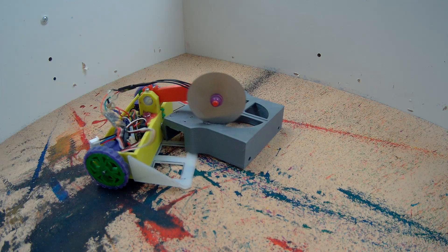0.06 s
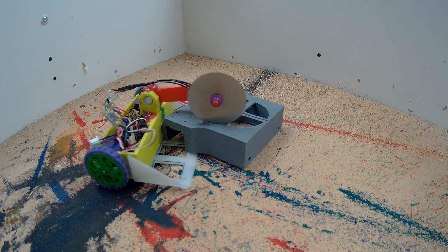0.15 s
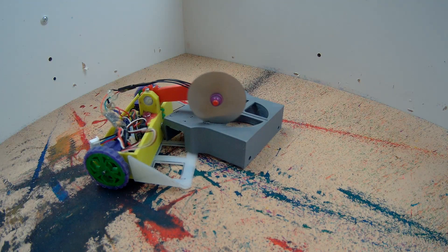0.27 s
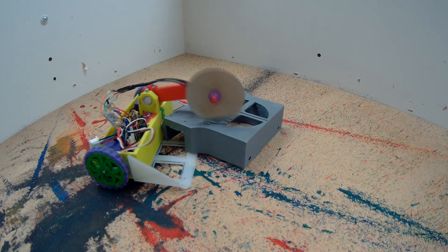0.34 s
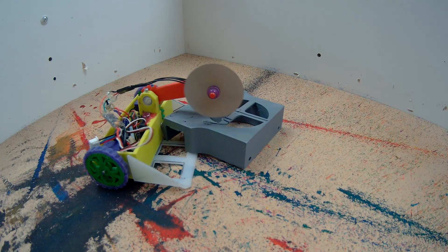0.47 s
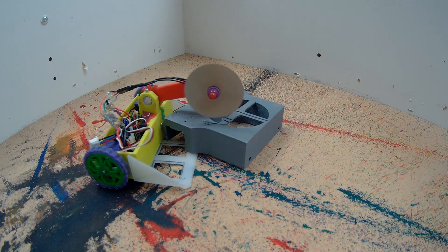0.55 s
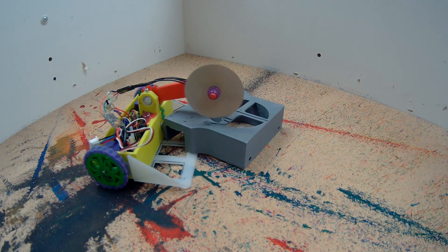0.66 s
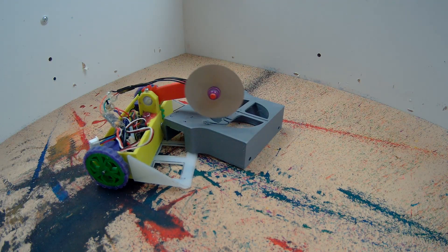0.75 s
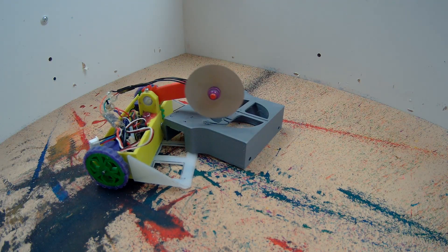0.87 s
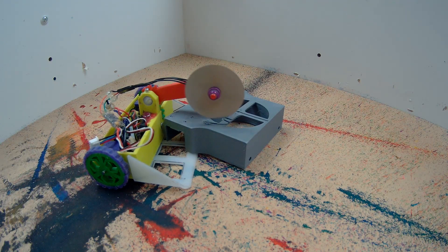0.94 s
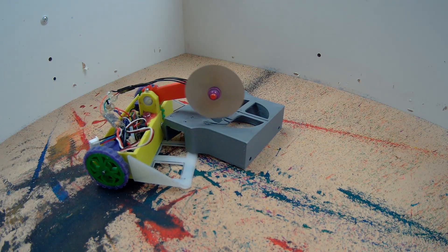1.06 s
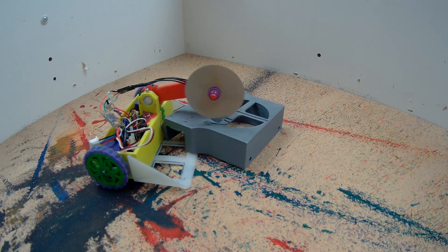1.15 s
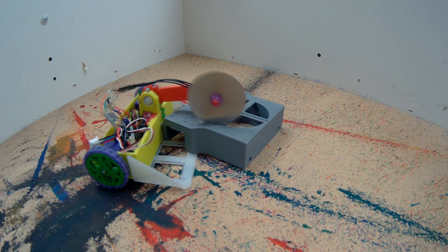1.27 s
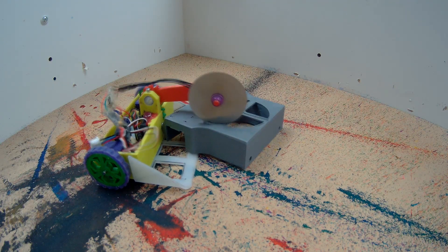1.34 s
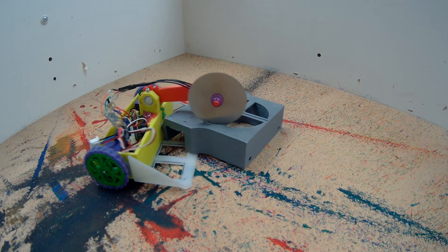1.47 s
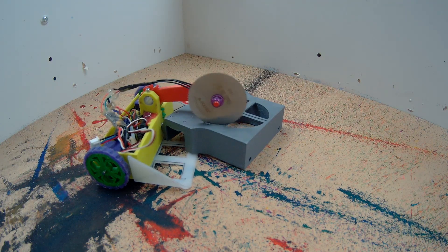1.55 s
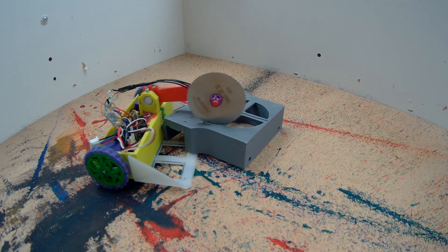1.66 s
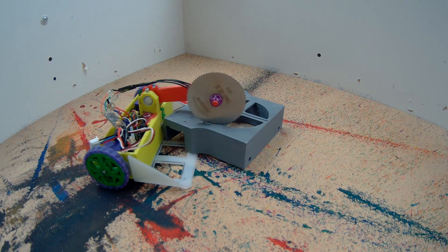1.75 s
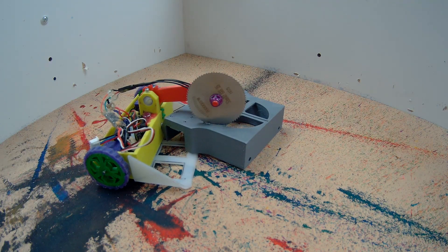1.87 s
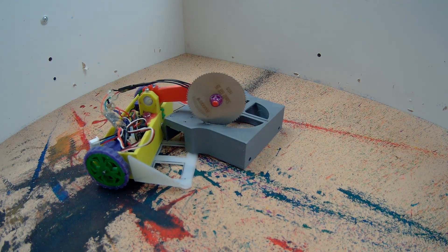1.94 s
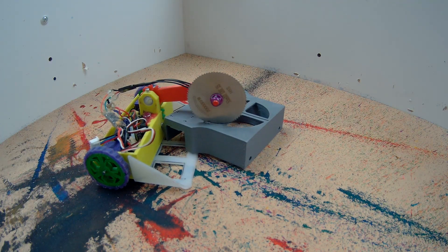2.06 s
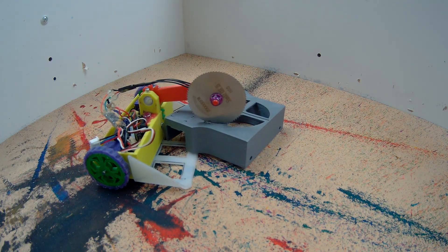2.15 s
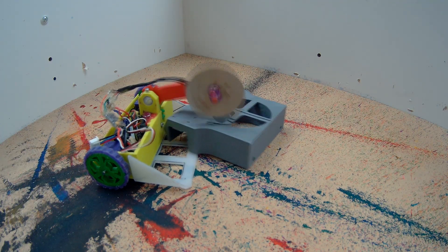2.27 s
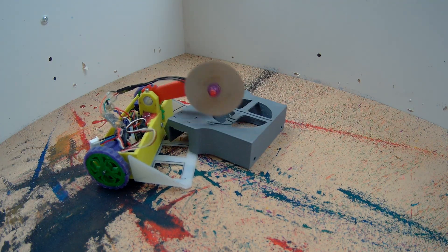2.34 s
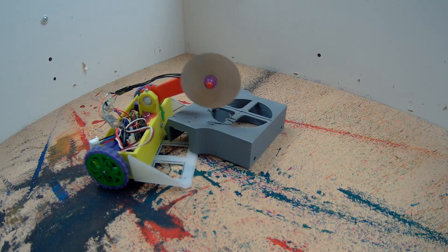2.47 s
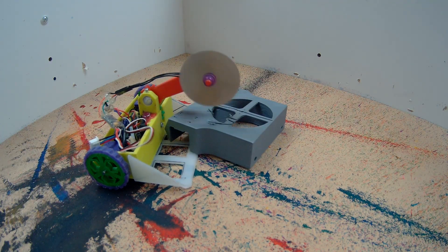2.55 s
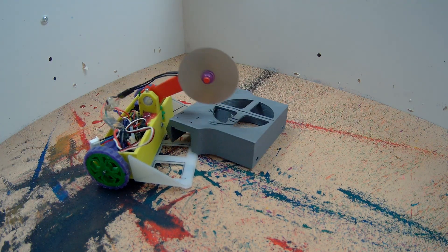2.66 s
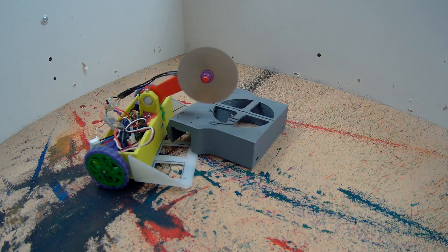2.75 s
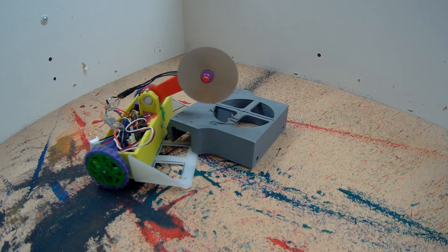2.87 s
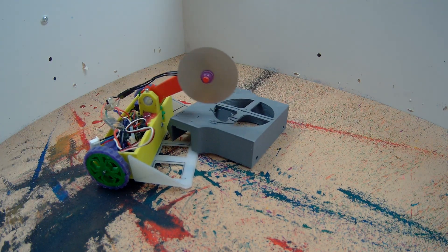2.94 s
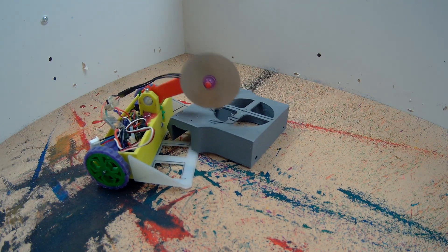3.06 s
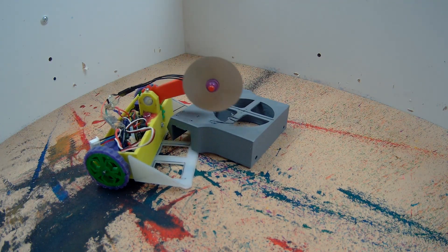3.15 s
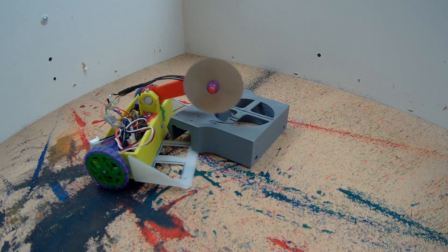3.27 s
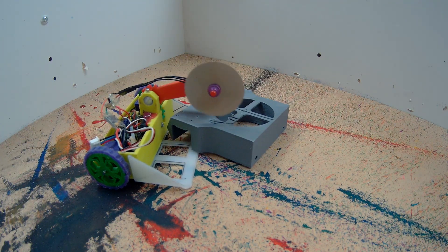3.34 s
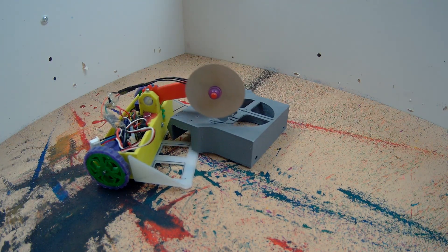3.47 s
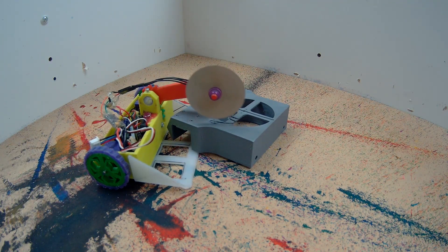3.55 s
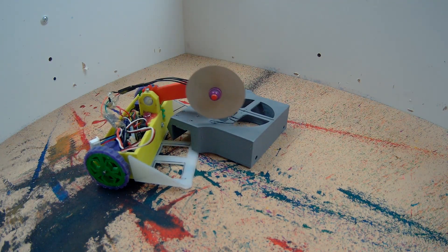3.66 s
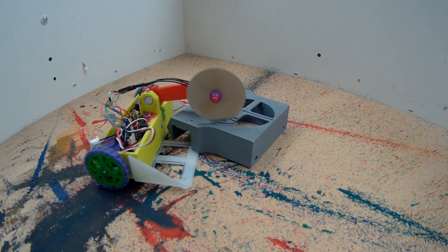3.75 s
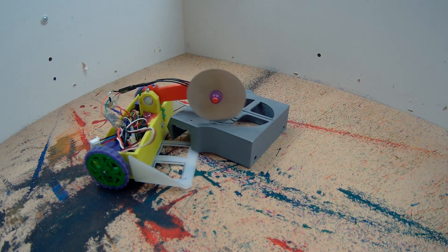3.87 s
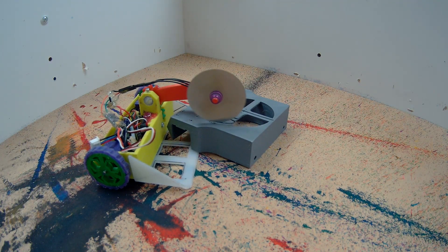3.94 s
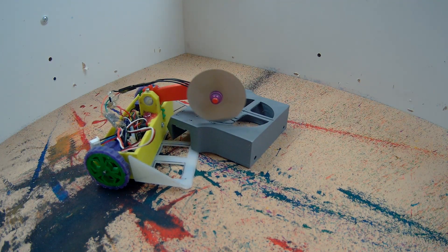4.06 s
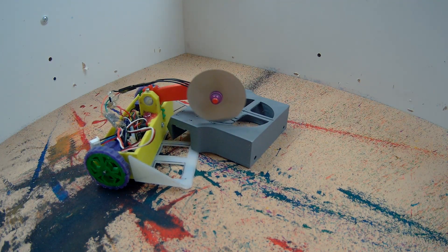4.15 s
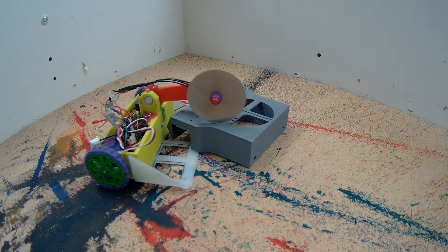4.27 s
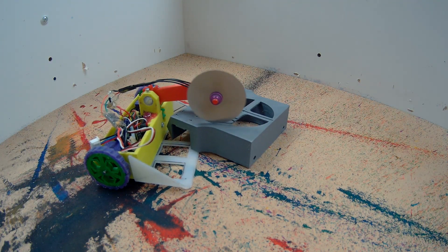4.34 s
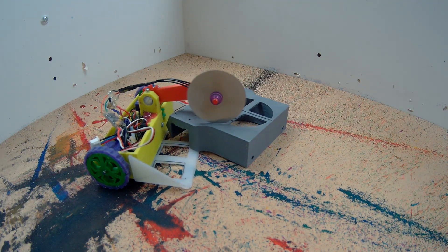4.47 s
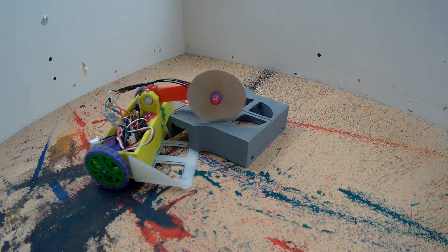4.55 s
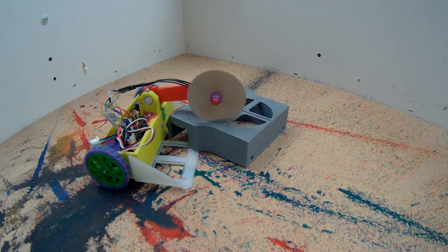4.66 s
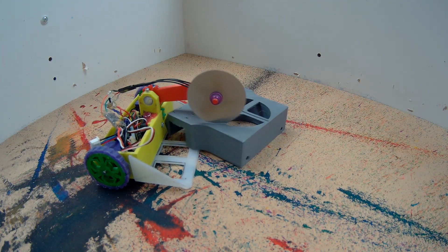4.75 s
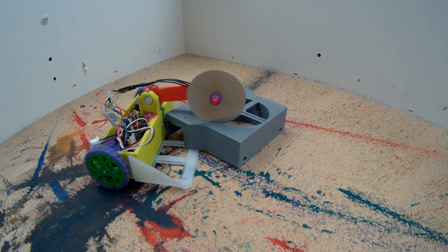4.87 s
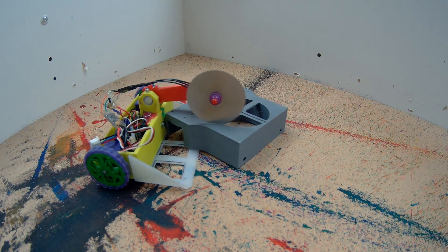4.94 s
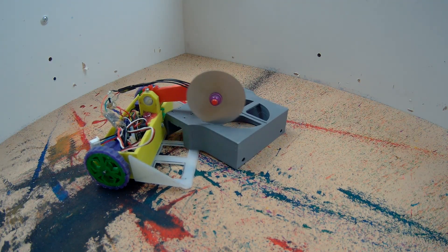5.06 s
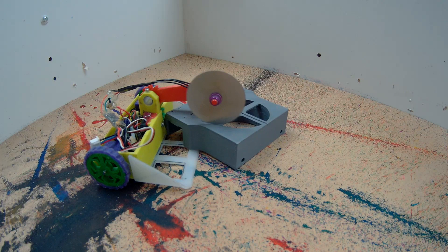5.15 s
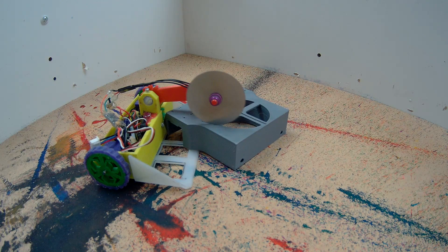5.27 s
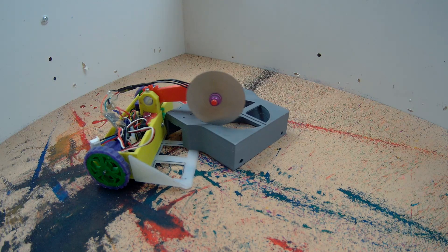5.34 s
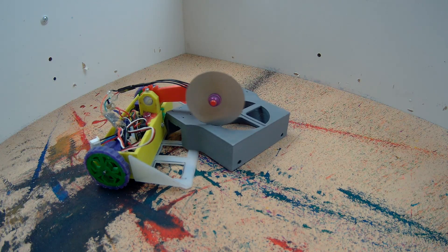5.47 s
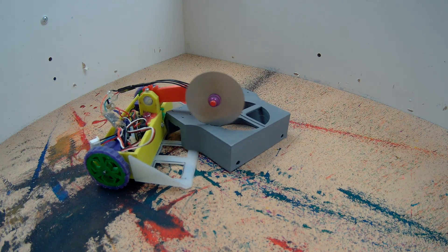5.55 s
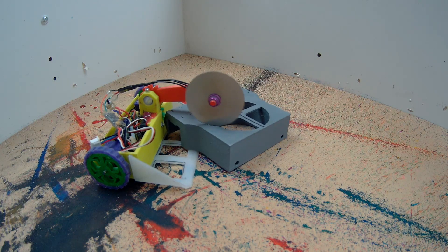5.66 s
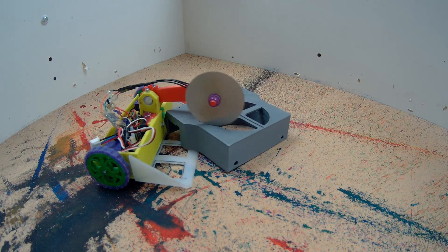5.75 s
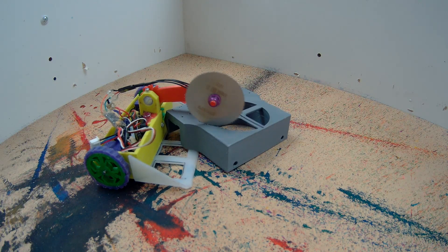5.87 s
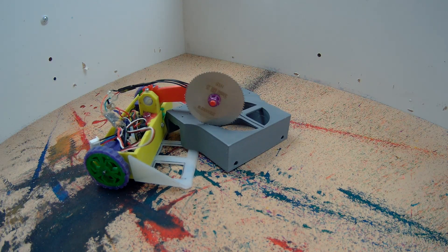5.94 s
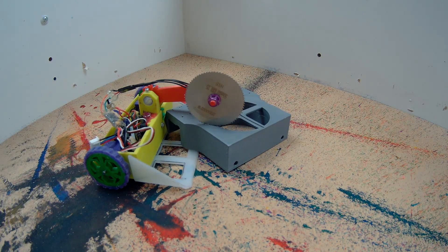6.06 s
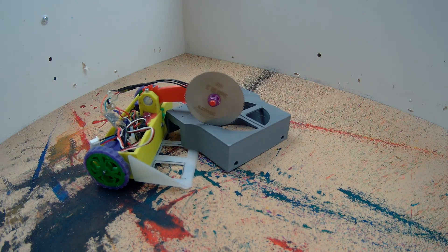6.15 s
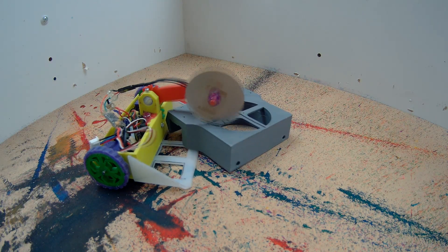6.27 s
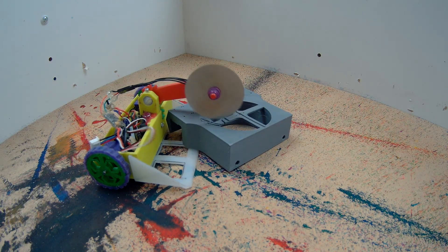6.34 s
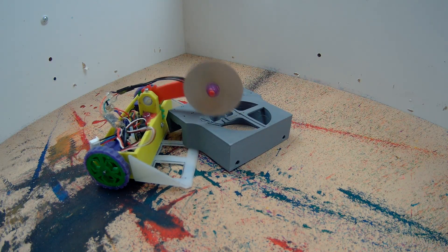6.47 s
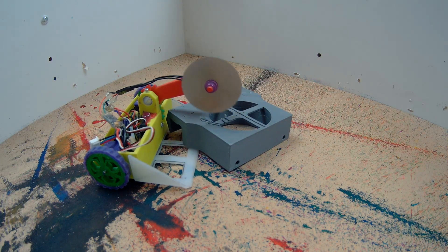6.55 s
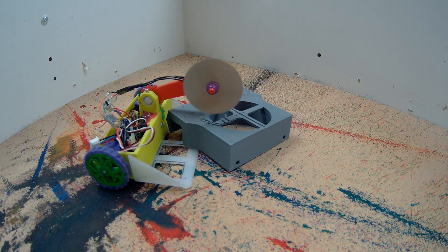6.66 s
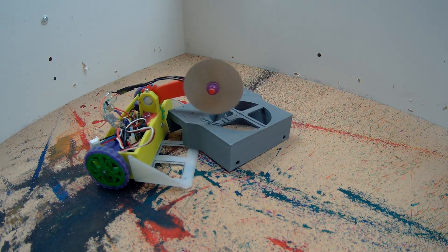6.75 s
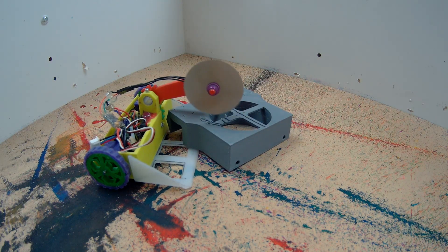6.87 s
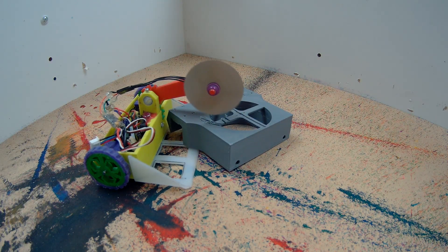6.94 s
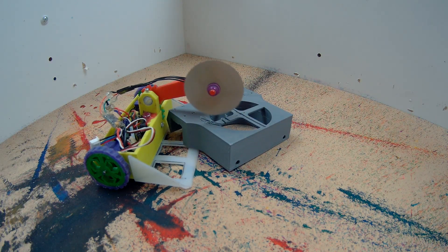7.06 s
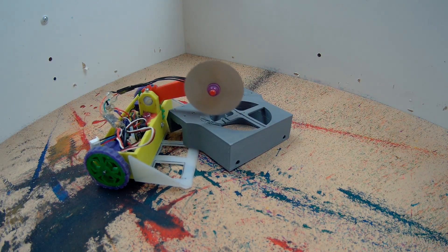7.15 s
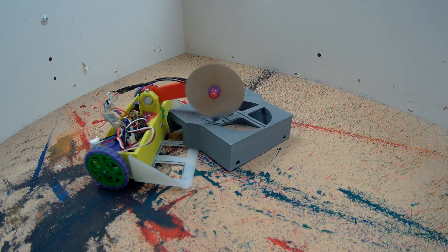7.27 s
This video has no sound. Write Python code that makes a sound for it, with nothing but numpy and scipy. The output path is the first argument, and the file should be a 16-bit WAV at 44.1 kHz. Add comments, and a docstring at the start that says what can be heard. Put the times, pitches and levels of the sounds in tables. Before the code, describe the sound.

Close, dry-ish perspective inside a small hard box with ringing resonances and very short echoes. From 0 to 0.5 s a dragging disc gives a ragged mid squeal, thin high whistle and gritty scraping, then breaks free and rises swiftly into a buzzing, hissy whine near 250 Hz. At 1.25 s it bites plastic with a loud bright crunch; the pitch plunges and stops by 1.6 s. From 1.8 to 2.25 s the stalled motor strains, stuttering in irregular, strengthening knocks. A brief squeal at 2.45 s starts another run-up; the frame rattles around 3-3.4 s. Raspy snags at 3.75 s lead to a softer buzzing graze until 4.3 s, then a sharp thud and long rough grinding, its whistle sliding downward to a halt near 5.95 s. Faint ticks follow in near quiet. At 6.43 s a weaker squeal launches a final run-up, loud and buzzing to the end.

```python
"""Saw robot in a test box

A small robot presses a spinning saw disc into a plastic block; air modes and echoes of the box colour it.
The disc drags free with a squeal, runs up, bogs down and stalls with stuttering kicks; after a restart
it grazes, bogs down and stalls again, then runs up once more. Tones are sines locked to the disc angle;
grinding, squeals, teeth and kicks are noise filtered by resonances and spectra.
"""
import sys
import numpy as np
from scipy import signal
from scipy.fft import rfft, irfft, next_fast_len
from scipy.io import wavfile
from scipy.ndimage import uniform_filter1d, map_coordinates

SR = 44100
rng = np.random.default_rng(int(sys.argv[2]) if len(sys.argv) > 2 else 0)


def digitize_waveform(pressure):
    """Quantize a signal to 16-bit integers and store it at the path in sys.argv[1].

    Rows of a 2-D input are taken as channels; values are limited to [-1, 1].
    """
    field = np.atleast_2d(pressure).T
    bounded = np.clip(field, -1, 1)
    quanta = np.round(bounded * 32767).astype(np.int16)
    wavfile.write(sys.argv[1], SR, quanta)


N = 322371
T = np.arange(N) / SR
HZ = np.fft.rfftfreq(next_fast_len(N + SR), 1 / SR)

# All table levels are relative.
# Air modes between the walls: centre_hz, width_hz, level_db
BOX_MODES = [(306.6, 20.7, 6), (438, 25, 9), (614, 37, 3), (672, 17, 3.5), (902.3, 7.4, 2), (951, 7.2, 3.5),
             (1093, 19, -1), (1160, 5.3, -12.5), (1222, 18.3, -0.5), (1367, 6.9, 0), (1484, 34.5, 2),
             (1695, 27, 1), (1807, 17, -4), (1834, 40, -8.5), (2003, 12, -5.5), (2128, 26, -1.5),
             (2295, 16, -7), (2384, 15, 3), (2508, 52, -3.5), (2765, 65, -4.5), (2968, 43, -2.5),
             (2930, 19, 0), (3670, 27, -16.5), (3770, 31, -15), (5350, 130, -9.5), (6176, 180, -1.5),
             (6820, 160, -3.5)]
# Disc run-ups: start_s, top_turns_per_s, slowness (time stretch)
RUN_UPS = [(.3038, 251.34, 1.1155), (2.4278, 256.39, 1), (6.4337, 256.39, .9274)]
# Disc braked by the block, one list per episode: time_s, speed_turns_per_s
BRAKED = [
    [(0, 70), (.36, 70)],
    [(1.255, 245.5), (1.3, 160), (1.42, 88), (1.5, 31), (1.6, 0), (2.36, 0), (2.44, 24)],
    [(3.7, 254.7), (4, 253.4), (4.3, 253.3), (4.38, 250.7), (4.46, 246), (4.54, 238.8), (4.68, 220),
     (4.85, 218), (5.05, 194), (5.2, 182), (5.3, 164), (5.48, 146), (5.62, 107), (5.68, 86), (5.74, 80),
     (5.8, 42), (5.95, 0), (6.38, 0), (6.445, 24)],
]
# Loudness change towards top speed, one row per run-up: overtones_db, noise_db
RUN_UP_LOUDNESS = [(-2.5, -2), (-1, 0), (3, 2)]
# Rim brushing the block: start_s, end_s, overtones_db, noise_db, shake_change_db, treble_db
GRAZES = [(3.88, 4.31, -16, -24, -18, -27)]
# One list per cut: time_s, grinding_db, treble_db, tooth_whistle_db, chassis_rumble_db
CUTS = [
    [(0, -23, -20.5, -80, -43), (.14, -23, -19.5, -80, -33.5), (.31, -25, -19.5, -80, -29.5),
     (.36, -32, -29, -80, -37), (.43, -32.5, -40, -80, -43), (.48, -37, -46, -80, -60)],
    [(1.235, -33, -27.5, -40, -54), (1.262, -13, -7, -15, -26.5), (1.3, -13.5, -14, -12, -39),
     (1.34, -21.5, -26, -26, -45), (1.46, -23.5, -21.5, -19, -31), (1.53, -23, -24, -26, -37),
     (1.61, -46.5, -67, -63, -42), (1.66, -70, -73, -80, -55)],
    [(4.29, -34, -36, -56, -60), (4.33, -20.5, -12, -50, -36), (4.52, -18.5, -15, -45, -33),
     (4.7, -17.5, -12.5, -32, -34.5), (5.05, -17.5, -17.5, -27, -36), (5.3, -18.5, -18, -20.5, -34),
     (5.47, -15.5, -14, -16.5, -34), (5.56, -19.5, -13, -24, -50), (5.7, -15.5, -13.5, -10, -42),
     (5.78, -17.5, -20.5, -19, -45), (5.84, -22.5, -18, -29, -42), (5.89, -31, -45, -45, -33.5),
     (5.97, -62, -80, -72, -52), (6.03, -77, -77, -80, -62)],
]
# Stalled motor straining: start_s, end_s, start_noise_db, end_noise_db
STALLS = [(1.83, 2.27, -47, -34), (6.1, 6.33, -49, -45)]
# Arm moving, chassis juddering on the floor: start_s, end_s, shake_db, rumble_db
JUDDERS = [(2.442, 2.564, -57, -40), (3.3, 3.8, -31, -39), (6.248, 6.29, -35, -38), (6.43, 6.53, -69, -47),
           (7.005, 7.31, -55, -48)]
# Disc dragging free: start_s, let_go_s, end_s, squeal_hz, squeal_db,
# whistle_start_hz, whistle_let_go_hz, whistle_db, scrape_db
RESTARTS = [(0, .43, .6, 1870, -16, 6100, 5450, -19, -33),
            (2.44, 2.51, 2.63, 1790, -24, 5300, 5400, -26, -24),
            (6.43, 6.51, 6.64, 1740, -32, 4700, 5300, -26, -33)]
# Hiss bands on the run-ups: start_s, end_s, centre_hz, level_db
HISS_BANDS = [(2.562, 2.682, 2800, -31.5), (6.6, 6.803, 2770, -27.5), (6.91, 7.2, 2570, -23)]
# Frame rattling as the arm swings, thudding as the disc bites: time_s, peak_db
RATTLES = [(2.956, -14.5), (3.1494, -12), (3.1794, -24), (3.2644, -14), (3.3644, -13), (3.3897, -11),
           (3.5844, -26), (4.3169, -12)]
# Stalled motor kicking the jammed disc: time_s, peak_db, t60_s
KICKS = [(1.781, -33.5, 0.1), (1.81, -29, 0.2), (1.856, -27, 0.077), (1.879, -21, 0.023),
         (1.907, -26, 0.16), (1.951, -25.5, 0.15), (1.999, -25, 0.06), (2.041, -12.5, 0.053),
         (2.081, -21, 0.067), (2.118, -10.5, 0.072), (2.166, -7, 0.022), (2.207, -7.5, 0.044),
         (2.237, -13, 0.03), (6.069, -30.5, 0.029), (6.132, -27.5, 0.24), (6.197, -28, 0.068),
         (6.228, -26, 0.16), (6.255, -31, 0.085), (6.402, -29.5, 0.15)]
# Kick spectrum: freq_hz, level_db
KICK_SPECTRUM = [(180, -41), (300, -10), (603, -28.5), (725, -27), (923, -1.5), (1020, -19), (1180, -14.5),
                 (1730, -5.5), (2140, -18), (2540, -5), (3180, -16), (5630, -11), (9000, -71), (11700, -63),
                 (19800, -120)]
# Tooth snagging the plastic: time_s, peak_db, centre_hz, t60_s
SNAGS = [(0.1999, 8, 3000, 0.045), (0.32, 2.5, 10600, 0.077), (1.2594, 16, 2820, 0.02),
         (1.2994, -6, 2940, 0.05), (3.7359, 5, 6260, 0.057), (3.7883, 2.5, 6220, 0.096),
         (3.8188, 7, 6000, 0.04), (4.316, 19, 6200, 0.012), (4.3894, -9, 5400, 0.22),
         (4.5069, 2.5, 5530, 0.081), (4.763, 5.5, 2920, 0.041), (5.5095, 4, 3050, 0.079)]
# Turning noise: speed_turns_per_s, bearings_db, bearing_treble_db, low_shake_db, drive_whine_db
NOISE_BY_SPEED = [(0, -67.5, -59.5, -59, -65.5), (24.3, -38, -29.5, -69, -34), (60, -47.5, -26, -62, -30.5),
                  (163.4, -35, -29.5, -49, -30), (194, -33, -29, -52, -46), (239.5, -31, -25.5, -42, -80),
                  (240, -24.5, -22.5, -41.5, -90.5), (268.8, -18.5, -27.5, -30.5, -77.5)]
# Grinding and bearing body spectrum: freq_hz, level_db
BODY_SPECTRUM = [(470, -48.5), (800, -17), (885, 4), (1010, -18), (1210, -0.5), (1320, -6.5), (2390, -3),
                 (6000, -14.5), (7800, -44), (13200, -120)]
# Low-mid shake spectrum: freq_hz, level_db
SHAKE_SPECTRUM = [(65, -45.5), (110, -7.5), (248, -1), (440, -7), (520, -5), (608, -1), (800, -15.5),
                  (1040, -57.5), (1760, -120)]
# Chassis rumble spectrum: freq_hz, level_db
RUMBLE_SPECTRUM = [(15, -46.5), (30, -17.5), (55, -12.5), (70, -9.5), (82, -4), (95, -16.5), (125, -19),
                   (170, -15.5), (250, -89)]
# Treble spectrum, running free: freq_hz, level_db
FREE_TREBLE_SPECTRUM = [(900, -86), (2200, -10), (3500, -5.5), (3660, 0.5), (4560, -0.5), (5270, -0.5),
                        (6910, -4.5), (8390, -5), (11700, -14), (13400, -16), (15800, -14.5)]
# Treble spectrum, cutting: freq_hz, level_db
CUT_TREBLE_SPECTRUM = [(900, -68.5), (2200, -31), (3300, -5), (3990, -3.5), (4700, -8.5), (6260, -4.5),
                       (7760, -4), (9620, -3), (12300, -13), (15800, -3.5)]
# Modes of the block: centre_hz, pole_width_hz, level_db
BLOCK_MODES = [(1221, 30, -9), (2344, 63, -17.5), (3000, 26, -13.5), (3085, 40, -11), (5340, 68, -16),
               (6430, 360, -24.5)]
# Disc tones: speed_turns_per_s, wobble_db, overtones_db
TONES_BY_SPEED = [(0, -80, -80), (50, -52, -50), (120, -43, -33), (160, -35, -28), (200, -34, -30),
                  (218, -32, -26.5), (228, -28, -20.5), (236, -25, -22), (242, -23, -20), (250, -22, -24),
                  (253, -22, -24), (255, -22, -21)]
# Frame and wall resonances swept by the overtones: centre_hz, width_hz, level_db
BUZZ_MODES = [(300, 40, 7), (448, 13, 0), (596, 11, 0), (643, 14, -6.5), (917, 27, 7.5), (1210, 14, -9.5),
              (1482.5, 26, 6), (1697, 21, 4.5), (1767, 21, 7), (2007, 39, 2), (2150, 68, -2), (2268, 23, 7),
              (2437, 39, -1.5), (2800, 206, -6.5), (3020, 40, -30), (3140, 61, -13), (3846, 39, -5)]
# Overtones of the brushing rim: multiple_of_turn_rate, level_db
GRAZE_OVERTONES = [(1, -7), (2, -25), (3, -36), (4, -25), (5, -19), (6, -6), (7, -7), (8, -23), (9, -16),
                   (10, 0), (11, -15), (12, -15), (13, -24), (14, -23), (15, -17), (16, -19), (17, -19),
                   (18, -24), (19, -23), (20, -16), (21, -18), (22, -21), (23, -20), (24, -18), (25, -20),
                   (26, -21), (27, -24), (28, -25), (29, -26), (30, -23), (31, -24), (32, -27), (33, -25),
                   (34, -27), (35, -27), (36, -24)]
# Thin high tone of the disc: time_s, level_db
RING_LEVEL = [(3.76, -60), (3.82, -39), (3.9, -44), (4.3, -44), (4.4, -60)]

RING_ORDER, TEETH = 58, 72  # ring tone and tooth rate, multiples of the turn rate
QUICK_SHARE, QUICK_S, SLOW_S = .7241, .1254, .3329  # run-up time constants, at slowness 1
LOUDNESS_FROM_TURNS_PER_S, LOUDNESS_FULL_TURNS_PER_S = 200, 240
ECHO_T60_S, ECHO_DB = 0.12, -0.5
GRAZE_EDGE_S, JUDDER_EDGE_S = 0.045, 0.084
STALL_RISE_S, STALL_FALL_S = 0.023, 0.25
STALL_TREBLE_DB, STALL_SHAKE_DB = -6, -5  # relative to the stall noise
STALL_RUMBLE_DB, STALL_WHINE_DB = -44.5, -57
FREE_RUMBLE_DB, WHINE_HZ = -61, 8625
CUT_WOBBLE_DB, CUT_DAMPING_DB, CUT_BUZZ_DB = -39, -4.5, -11.5  # last two: change of the free tones
CUT_SHAKE_DB, SHAKE_DB_PER_TURN = [-11.5, -15, -11.5], 0.0049  # relative to each cut; dB per turn/s
BOUNCE_HZ, BOUNCE_POLE_WIDTH_HZ, BOUNCE_DB = 82, 9, -2  # chassis on its wheels; dB relative to rumble
WHISTLE_END_HZ, SWELL_S, DRAG_DB_PER_S = 4160, 0.046, -14
SQUEAL_DIES_DB, WHISTLE_DIES_DB = -28, -20  # from let-go to end
HISS_POLE_WIDTH_HZ, HISS_EDGE_S = 640, .1
RATTLE_HZ, RATTLE_POLE_WIDTH_HZ, RATTLE_T60_S = 1930, 1030, .08
EDGE_HZ = 15760


def amp(db):
    """Amplitude of a dB level."""
    return np.exp(np.asarray(db) * np.log(10) / 20)


def summed(*dbs):
    """Gain of unrelated parts together."""
    return np.sqrt(sum(amp(2 * db) for db in dbs))


def loudest(curves):
    """Pointwise maximum."""
    return np.max(list(curves), axis=0)


def evened(x):
    """Scale to unit RMS."""
    return x / np.sqrt(np.mean(x ** 2) + 1e-20)


def add(mix, start_s, sound):
    """Add a sound in place, cut off at the end of the mix."""
    part = mix[max(round(start_s * SR), 0):][:len(sound)]
    part += sound[:len(part)]


def drift(count, knots_per_s):
    """Slow random curve of roughly unit size."""
    knots = rng.standard_normal(int(count / SR * knots_per_s) + 3)
    return map_coordinates(knots, [np.arange(count) * knots_per_s / SR], order=2)


def level(points):
    """Gain through (time_s, level_db) points; -120 dB outside."""
    s, db = np.transpose(points)
    return amp(np.interp(T, s, db, left=-120, right=-120))


def held(start_s, end_s, rise_s, fall_s):
    """Attack, hold at 0 dB and release, with -40 dB at the outer ends."""
    times_s = [start_s - rise_s, start_s, end_s, end_s + fall_s]
    return np.interp(T, times_s, [-40, 0, 0, -40], left=-120, right=-120)


def by_speed(table, speed):
    """Level curves in dB looked up at each disc speed."""
    turns, *dbs = np.transpose(table)
    return [np.interp(speed, turns, db) for db in dbs]


def shape(points):
    """Spectral gain, dB linear in log frequency."""
    f, db = np.transpose(points)
    return amp(np.interp(np.log(HZ + 1), np.log(f + 1), db))


def peaks(hz, modes):
    """Power sum of resonance peaks."""
    return sum(amp(2 * db) / (1 + (2 * (hz - f) / w) ** 2) for f, w, db in modes)


def colour(x, gain):
    """Causal minimum-phase filter: the phase follows from the log gain."""
    cepstrum = irfft(np.log(gain + 1e-5))
    cepstrum[1:len(HZ) - 1] *= 2
    cepstrum[len(HZ):] = 0
    return irfft(rfft(x, len(cepstrum)) * np.exp(rfft(cepstrum)))[:N]


def resonate(x, hz, pole_width_hz):
    """Double-pole resonance: shift hz to zero, smooth twice, shift back; unit RMS."""
    turn = np.exp(2j * np.pi * np.cumsum(hz * np.ones(len(x))) / SR)
    r = np.exp(-np.pi * pole_width_hz / SR)
    smooth = signal.lfilter([1], np.convolve([1, -r], [1, -r]), x / turn)
    return evened((turn * smooth).real)


def box_gain(bed_db=-14):
    """Air-mode peaks over a flat bed, relative to the bed."""
    power = amp(2 * bed_db) + peaks(HZ, BOX_MODES)
    return np.sqrt(power) / amp(bed_db)


def walls(x):
    """Wall echoes: sparse taps of random sign that die away."""
    t = np.arange(SR // 4) / SR
    signs = rng.choice([-1., 1.], len(t))
    taps = signs * (rng.random(len(t)) < .05) * amp(-60 * t / ECHO_T60_S) * (t > .002)
    echoes = signal.oaconvolve(x, taps / np.linalg.norm(taps))[:N]
    return (x + amp(ECHO_DB) * echoes) / np.sqrt(1 + amp(2 * ECHO_DB))


def turns_per_s():
    """Disc speed: two-part exponential run-ups, braking by the block; inertia rounds the corners."""
    speed = np.zeros(N)
    for start_s, top, slowness in RUN_UPS:
        u = np.maximum(T - start_s, 0) / slowness
        left = QUICK_SHARE * np.exp(-u / QUICK_S) + (1 - QUICK_SHARE) * np.exp(-u / SLOW_S)
        speed = np.where(u > 0, top * (1 - left), speed)
    for rows in BRAKED:
        braked = (T >= rows[0][0]) & (T <= rows[-1][0])
        speed = np.where(braked, np.interp(T, *np.transpose(rows)), speed)
    return uniform_filter1d(speed, size=SR // 40)


def run_up_db(speed):
    """Overtone and noise dB change of the latest run-up, fading in towards top speed."""
    run = np.maximum(np.searchsorted(np.transpose(RUN_UPS)[0], T) - 1, 0)
    near_top = np.interp(speed, [LOUDNESS_FROM_TURNS_PER_S, LOUDNESS_FULL_TURNS_PER_S], [0, 1])
    return np.transpose(RUN_UP_LOUDNESS)[:, run] * near_top


def cuts():
    """Grinding, treble, whistle and rumble dB of all cuts; -120 dB between them."""
    return loudest([np.interp(T, s, db, left=-120, right=-120) for db in dbs]
                   for s, *dbs in map(np.transpose, CUTS))


def grazing():
    """Share of the sound due to the brushing rim, 0-1."""
    return loudest(np.interp(T, [a - GRAZE_EDGE_S, a, b, b + GRAZE_EDGE_S], [0, 1, 1, 0])
                   for a, b, *_ in GRAZES)


def strain():
    """Envelope dB and noise dB of the motor straining in the stalls."""
    on_db = loudest(held(a, b, STALL_RISE_S, STALL_FALL_S) for a, b, *_ in STALLS)
    times_s = [s for row in STALLS for s in row[:2]]
    noise_db = [db for row in STALLS for db in row[2:]]
    return on_db, on_db + np.interp(T, times_s, noise_db)


def floor_hiss():
    """Microphone floor: steady white noise."""
    return amp(-67) * rng.standard_normal(N)


def hiss_bands():
    """Noise around one pitch that swells unevenly."""
    start_s, _, hz, _ = np.transpose(HISS_BANDS)
    db = loudest(db + held(a, b, HISS_EDGE_S, HISS_EDGE_S) for a, b, _, db in HISS_BANDS)
    gain = amp(db + 2.5 * drift(N, 20))
    return gain * resonate(rng.standard_normal(N), np.interp(T, start_s, hz), HISS_POLE_WIDTH_HZ)


def rattles():
    """Short bursts of mid-pitched clatter, coloured by the box modes."""
    envelope, t = np.zeros(N), np.arange(SR // 5) / SR
    for s, db in RATTLES:
        add(envelope, s, amp(db - 60 * t / RATTLE_T60_S) * np.minimum(t / 0.0071, 1))
    clatter = resonate(rng.standard_normal(N), RATTLE_HZ, RATTLE_POLE_WIDTH_HZ)
    return envelope * evened(colour(clatter, box_gain()))


def kicks():
    """Kicks of the stalled motor: noise bursts that die away, coloured by the box."""
    envelope, t = np.zeros(N), np.arange(SR // 5) / SR
    for s, db, t60_s in KICKS:
        add(envelope, s, amp(db - 60 * t / t60_s) * np.minimum(t / 0.0022, 1))
    noise = rng.standard_normal(N)
    gain = shape(KICK_SPECTRUM) * box_gain() ** .5
    return amp(-6) * colour(envelope * noise, gain / np.sqrt(np.mean(gain ** 2)))


def drive_whine(speed):
    """Ragged narrow noise from the drive, turning or straining."""
    whine_db = by_speed(NOISE_BY_SPEED, speed)[3]
    gain = summed(whine_db, strain()[0] + STALL_WHINE_DB) * amp(2.5 * drift(N, 30))
    return gain * resonate(rng.standard_normal(N), WHINE_HZ * (1 + 0.007 * drift(N, 15)), 350)


def restarts():
    """Stick-slip squeal with its octave, and a gliding two-part whistle, all ragged."""
    out = np.zeros(N)
    for s, go, end, hz, db, from_hz, go_hz, whistle_db, _ in RESTARTS:
        t = np.arange(s, end, 1 / SR)
        count = len(t)
        freed = np.clip((t - go) / (end - go), 0, 1)
        swell = np.clip((t - s) / SWELL_S, s == 0, 1) ** 2  # already sounding if it starts at 0 s
        swell = swell * amp(DRAG_DB_PER_S * np.minimum(t - s, go - s))
        noise = rng.standard_normal((4, count))

        squeal_hz = hz * (1 + .012 * drift(count, 12))
        # the walls pick out several pitches
        cluster = colour(resonate(noise[0], squeal_hz, 140), box_gain())[:count]
        squeal = evened(cluster) + amp(-12.5) * resonate(noise[1], 2 * squeal_hz, 200)
        squeal_gain = amp(db + SQUEAL_DIES_DB * freed + 2 * drift(count, 30))

        whistle_hz = np.interp(t, [s, go, end], [from_hz, go_hz, WHISTLE_END_HZ])
        whistle_hz = whistle_hz * (1 + .02 * drift(count, 30))
        lower = amp(-4) * (t > go - SWELL_S) * resonate(noise[3], .67 * whistle_hz, 200)
        whistle = resonate(noise[2], whistle_hz, 340) + lower
        whistle_gain = amp(whistle_db + WHISTLE_DIES_DB * freed ** 3 + 4 * drift(count, 40))
        add(out, s, swell * (squeal_gain * squeal + whistle_gain * whistle))
    return out


def snags(angle):
    """One tooth strikes each turn, with scraping between: a pitched rasp plus a wide bright part."""
    out, t = np.zeros(N), np.arange(SR // 5) / SR
    strikes = evened(np.diff(np.floor(angle / (2 * np.pi)), prepend=0))
    drive = strikes + 0.73 * rng.standard_normal(N)
    for s, db, hz, t60_s in SNAGS:
        part = drive[round(s * SR):][:len(t)]
        rasp = resonate(part, hz, 460) + amp(-11.0) * resonate(part, 11000, 4600)
        add(out, s, amp(db - 60 * t / t60_s) * np.minimum(t / 0.0058, 1) * rasp)
    return amp(-8) * out


def teeth(speed, bite_db):
    """Uneven bites make the tooth rate a ragged whistle that follows the speed."""
    hz = np.minimum(TEETH * speed * (1 + .015 * drift(N, 35)), 17000)
    ragged = amp(3.9 * drift(N, 40)) * resonate(rng.standard_normal(N), hz, 1500)
    return amp(bite_db) * evened(colour(ragged, box_gain() ** 0.22))


def noise_levels(speed, cut):
    """Body, shake, rumble and treble gains: free disc, cuts, stalls, restarts, judders, brush."""
    free = np.array(by_speed(NOISE_BY_SPEED, speed)) + run_up_db(speed)[1]
    bearings_db, bearing_treble_db, low_shake_db, _ = free
    cut_db, cut_treble_db, _, cut_rumble_db = cut
    cut_index = np.searchsorted([rows[0][0] for rows in CUTS[1:]], T)
    cut_shake_db = cut_db + np.array(CUT_SHAKE_DB)[cut_index] + SHAKE_DB_PER_TURN * speed
    stall_on_db, stall_db = strain()
    scrape_db = loudest(row[-1] + held(row[1], row[2], SWELL_S, SWELL_S) for row in RESTARTS)
    judder_shake_db, judder_rumble_db = loudest(
        np.array([[shake_db], [rumble_db]]) + held(a, b, JUDDER_EDGE_S, JUDDER_EDGE_S)
        for a, b, shake_db, rumble_db in JUDDERS)
    brush = grazing()
    _, _, _, brush_db, brush_shake_db, brush_treble_db = GRAZES[0]

    body = (1 - brush) * amp(bearings_db) + summed(cut_db, stall_db, scrape_db) + brush * amp(brush_db)
    shake = summed(low_shake_db + brush * brush_shake_db, cut_shake_db,
                   stall_db + STALL_SHAKE_DB, judder_shake_db)
    rumble = summed(FREE_RUMBLE_DB, cut_rumble_db, stall_on_db + STALL_RUMBLE_DB, judder_rumble_db)
    treble = summed(bearing_treble_db, cut_treble_db, stall_db + STALL_TREBLE_DB)
    treble = treble + brush * amp(brush_treble_db)
    return (body * amp(2 * drift(N, 14)), shake * amp(3.13 * drift(N, 14)),
            rumble * amp(2.33 * drift(N, 12)), treble * amp(1.2 * drift(N, 14)))


def grind(speed, angle, cut):
    """Grainy noise swelling once a turn; hard cutting changes the treble and rings the block."""
    body, shake, rumble, treble = noise_levels(speed, cut)
    cutting = np.clip((cut[1] + 20.5) / 4, 0, 1)
    grains = rng.standard_normal((6, N)) * amp(3.83 * rng.standard_normal((6, N)))
    grains *= (1 + 0.062 * np.cos(angle)) * amp(1.48 * drift(N, 60))
    ring = sum(amp(db + 2.54 * drift(N, 18)) * resonate(grains[5], hz, w) for hz, w, db in BLOCK_MODES)
    box = box_gain()

    def layer(k, gain, spectrum):
        return gain * evened(colour(grains[k], spectrum))

    low = layer(0, body, shape(BODY_SPECTRUM) * box)
    low += layer(1, shake, shape(SHAKE_SPECTRUM) * box)
    low += layer(2, rumble, shape(RUMBLE_SPECTRUM))
    low += rumble * amp(BOUNCE_DB) * resonate(grains[2], BOUNCE_HZ, BOUNCE_POLE_WIDTH_HZ)
    high = layer(3, treble * np.sqrt(1 - cutting), shape(FREE_TREBLE_SPECTRUM) * box ** .5)
    high += layer(4, treble * np.sqrt(cutting), shape(CUT_TREBLE_SPECTRUM) * box ** .5)
    return low + body * cutting * ring + walls(high)


def spin(speed, angle, cut_db):
    """Pure wobble tone; overtones swell as they cross resonances, or follow the brush."""
    wobble_db, buzz_db = by_speed(TONES_BY_SPEED, speed)
    buzz_db = buzz_db + run_up_db(speed)[0]
    brushing = grazing()
    cut = np.clip((cut_db + 34) / 10, 0, 1)
    wobble = summed(wobble_db + CUT_DAMPING_DB * cut, CUT_WOBBLE_DB - 80 * (1 - cut) ** 2)
    to_brush_db = brushing * (GRAZES[0][2] - buzz_db)
    slow_cut_db = -60 * cut * (speed < 215)  # overtones vanish in a slowed cut
    buzz = amp(buzz_db + CUT_BUZZ_DB * cut + to_brush_db + slow_cut_db)

    # power share of each overtone, every 64 samples
    slow = np.arange(0, N, 64)
    orders, brush_db = np.transpose(GRAZE_OVERTONES[1:])  # from the second multiple up
    hz = orders[:, None] * speed[slow]
    bed = amp(-25) / (1 + (hz / 1600) ** 3)
    free = bed + peaks(hz, BUZZ_MODES)
    brush = amp(2 * brush_db)[:, None]
    share = brushing[slow]
    power = (1 - share) * free / free.sum(0) + share * brush / brush.sum()

    out = wobble * np.sin(angle)
    out += level(RING_LEVEL) * amp(3 * drift(N, 25)) * np.cos(RING_ORDER * angle)
    turn = multiple = np.exp(1j * angle)
    for p in power:
        multiple = multiple * turn
        waver = amp((4 - 3 * share) * drift(len(slow), 64 * 16))  # 16 knots per s
        gain = buzz * np.interp(T, slow / SR, np.sqrt(p) * waver)
        out += gain * (multiple * np.exp(2j * np.pi * rng.random())).real
    return np.sqrt(2) * out


def scene():
    """Mix of all sources, one channel."""
    speed, cut = turns_per_s(), cuts()
    angle = 2 * np.pi * np.cumsum(speed) / SR
    echoed = hiss_bands() + rattles() + kicks() + drive_whine(speed) + restarts()
    echoed = walls(echoed + snags(angle) + teeth(speed, cut[2]))
    return (floor_hiss() + echoed + grind(speed, angle, cut) + spin(speed, angle, cut[0]))[None]


def record(dry):
    """Overload rounds mainly the highest peaks, then a low-pass limits the band."""
    soft = dry / (1 + dry ** 6) ** (1 / 6)
    low_pass = signal.firwin(2047, EDGE_HZ, window=("kaiser", 12), fs=SR)
    return signal.oaconvolve(soft, low_pass[None], "same")


dry = scene()
out = record(dry)
digitize_waveform(out)
```